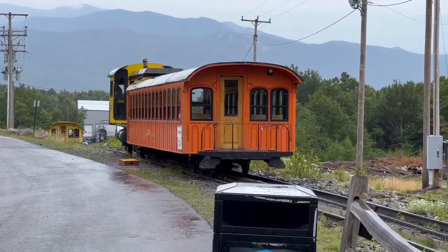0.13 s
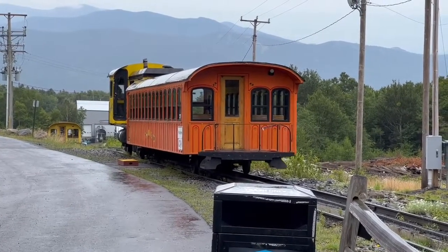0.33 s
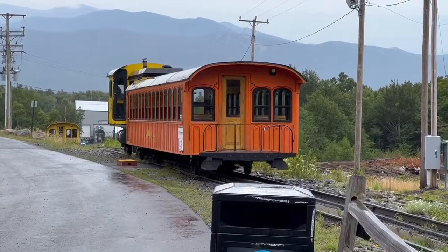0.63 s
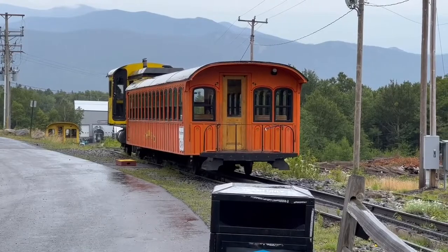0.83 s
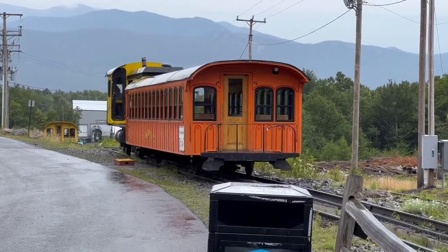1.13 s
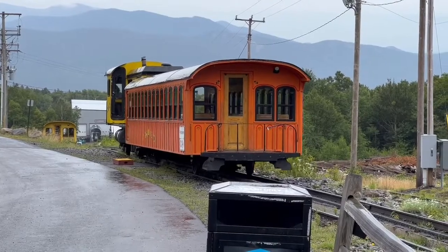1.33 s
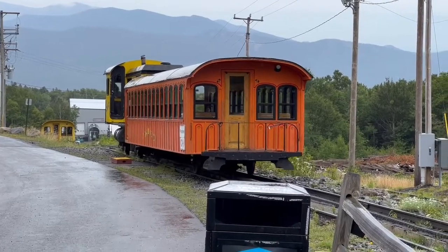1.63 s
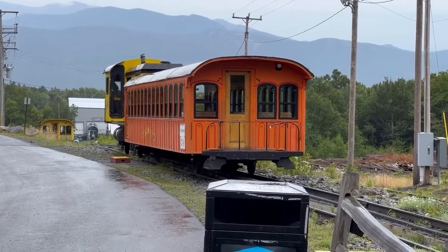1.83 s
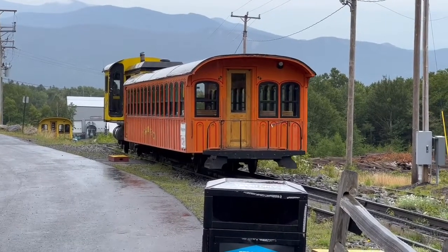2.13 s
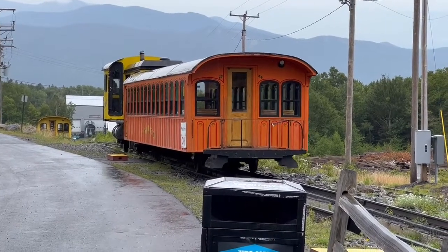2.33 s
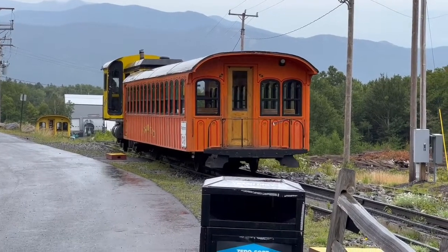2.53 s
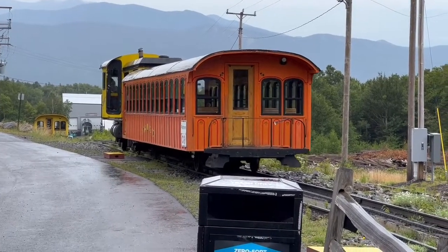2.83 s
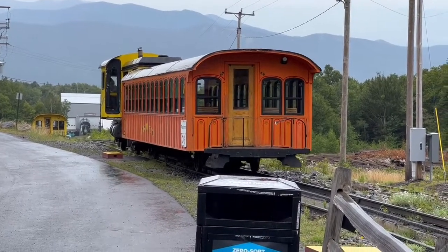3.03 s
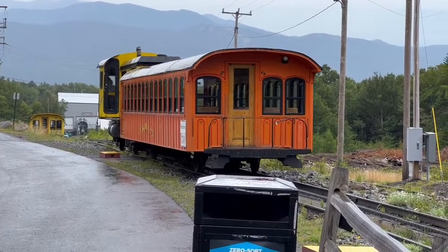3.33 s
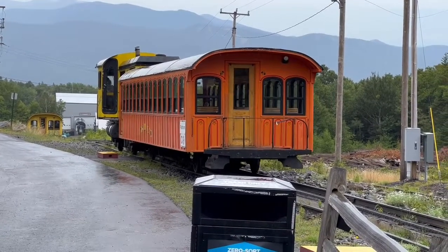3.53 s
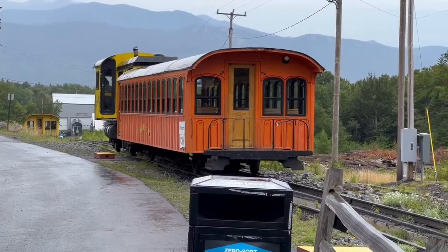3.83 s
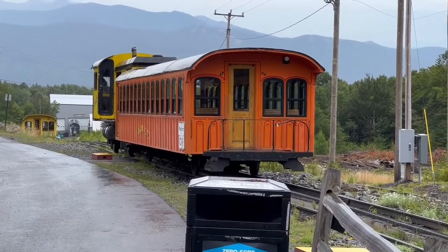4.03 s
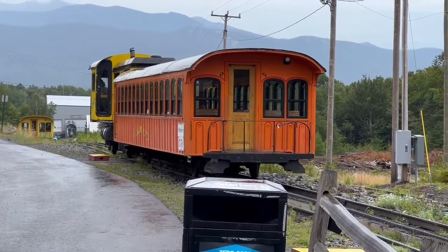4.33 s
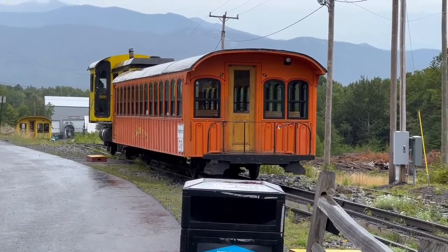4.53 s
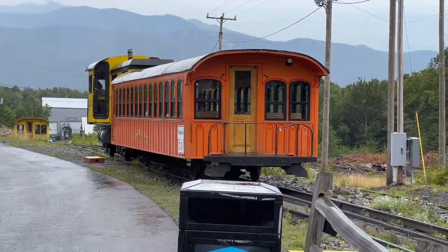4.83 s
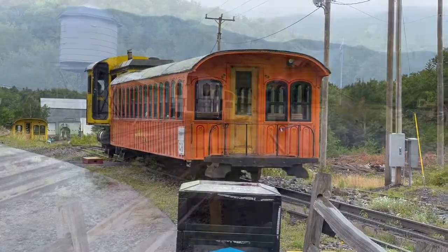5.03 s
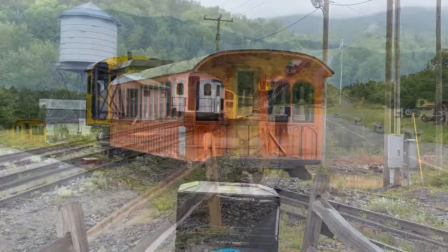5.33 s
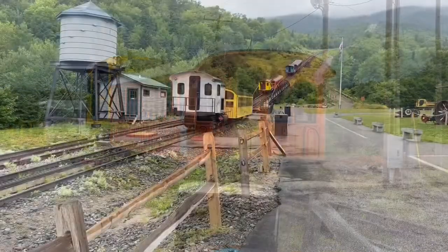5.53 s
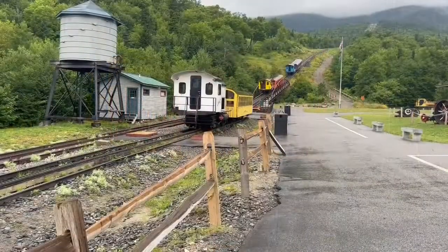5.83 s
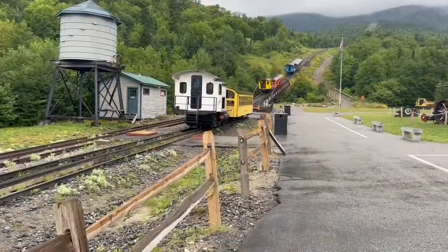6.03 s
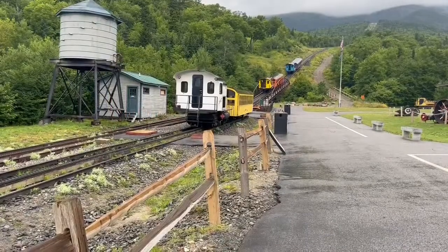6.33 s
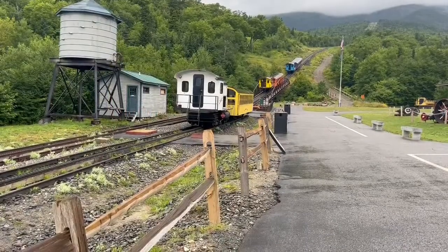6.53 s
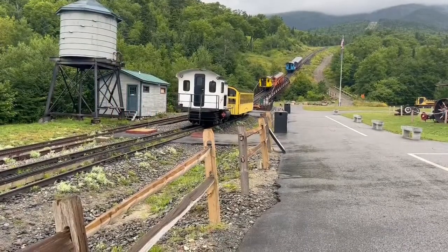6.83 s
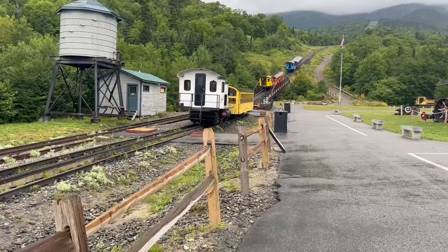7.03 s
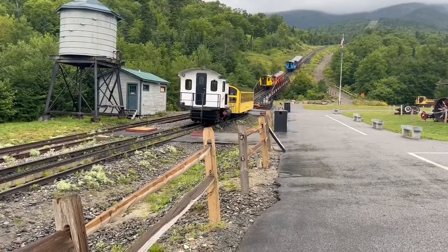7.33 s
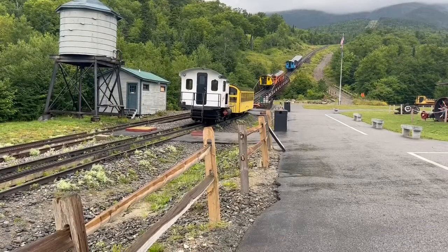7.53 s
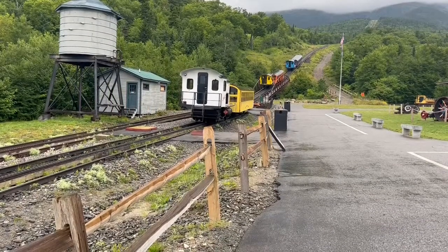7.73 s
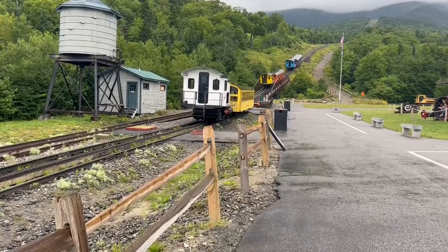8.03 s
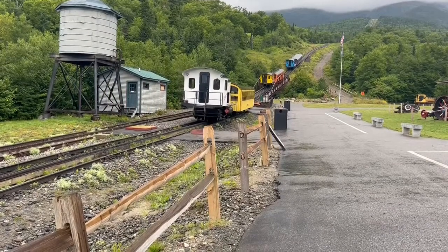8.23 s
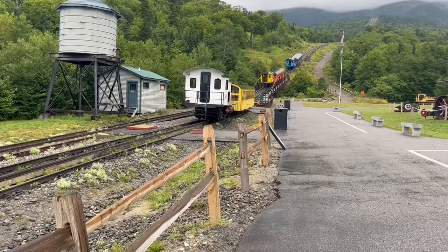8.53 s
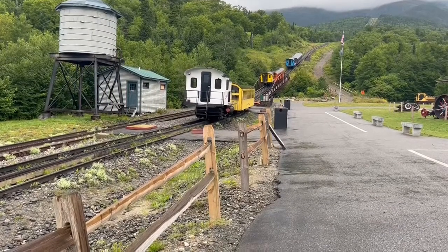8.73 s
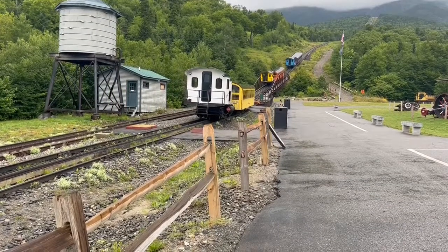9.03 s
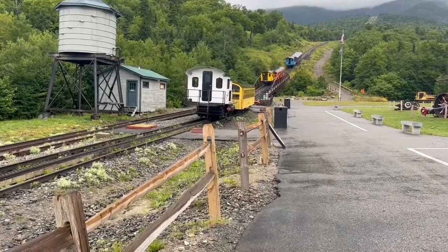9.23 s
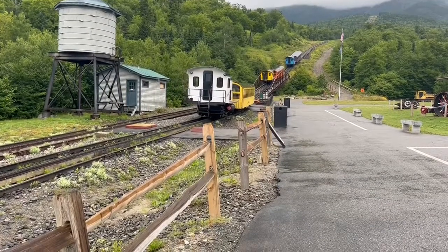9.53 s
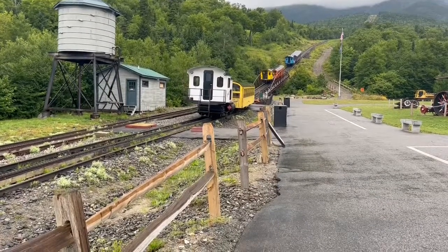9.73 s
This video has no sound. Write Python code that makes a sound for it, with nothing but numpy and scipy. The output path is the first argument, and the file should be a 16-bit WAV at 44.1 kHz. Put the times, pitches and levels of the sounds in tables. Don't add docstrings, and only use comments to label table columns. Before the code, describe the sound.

Wind thumps the microphone over a distant idling diesel locomotive with thin squeals, then a fade to a nearer, louder engine clanking and rattling.

```python
import sys
import numpy as np
from scipy import signal
from scipy.fft import rfft, irfft, next_fast_len
from scipy.io import wavfile
from scipy.ndimage import uniform_filter1d

SR = 44100
rng = np.random.default_rng(int(sys.argv[2]) if len(sys.argv) > 2 else 0)


def volts(x):
    e = np.asarray(x, float) / 20
    return 10 ** e


def digitize_waveform(pressure):
    field = np.atleast_2d(pressure).T
    bounded = np.clip(field, -1, 1)
    quanta = np.round(bounded * 32767).astype(np.int16)
    wavfile.write(sys.argv[1], SR, quanta)


N = 436149
TIME = np.arange(N) / SR
FAR, NEAR = 0, 1
DISSOLVE = (4.79, 5.5)


def evened(x):
    return x / np.sqrt(np.mean(x ** 2) + 1e-20)


def read(points, hz):
    f, db = np.transpose(points)
    return np.interp(np.log(hz + 1), np.log(f + 1), db, -200, -200)


def curves(rows):
    s, *columns = np.transpose(rows)
    return [np.interp(TIME, s, c) for c in columns]


def add(mix, s, sound):
    part = mix[round(s * SR):][:len(sound)]
    part += sound[:len(part)]


def coloured(db):
    return irfft(rfft(rng.standard_normal(N)) * volts(db), N)


def wander(hz):
    n = next_fast_len(N // 64 + 2)
    fall_db = -24 * (np.fft.rfftfreq(n, 64 / SR) / hz) ** 2
    slow = irfft(rfft(rng.standard_normal(n)) * volts(fall_db), n)
    return evened(np.interp(np.arange(N) / 64, np.arange(n), slow))


def resonate(x, hz, width, order=1):
    turn = np.exp(2j * np.pi * np.cumsum(hz * np.ones(len(x))) / SR)
    r = np.exp(-np.pi * width / SR)
    smooth = signal.sosfilt([[1 - r, 0, 0, 1, -r, 0]] * order, x / turn + 1e-18)
    return 2 * (turn * smooth).real


def gap(x, low_hz, high_hz, slope_hz=1):
    hz = np.fft.rfftfreq(N, 1 / SR)
    away = np.maximum(low_hz - hz, 3 * (hz - high_hz))
    edge = volts(-30 * np.clip(1 - away / slope_hz, 0, 1))
    return irfft(rfft(x) * (away > 0) * edge, N)


def swells(rows):
    power = 0
    for s, db, rise, t60 in rows:
        fall_db = np.where(TIME < s, 40 * (s - TIME) / rise, 120 * (TIME - s) / t60)
        power = power + volts(2 * db - fall_db)
    return np.sqrt(power)


def ports(mid, side):
    return np.array([mid + side, mid - side])


def dissolve(far, near):
    turn = np.interp(TIME, DISSOLVE, [0, np.pi / 2])
    return far * np.cos(turn) + near * np.sin(turn)


# time in seconds, load as roar level in dB,
# firing tone in dB, fan tone in dB.
ENGINE = [(0.0, -42.5, -32, -37.5), (0.4, -40.5, -38.5, -41.5), (0.93, -41.5, -31.5, -38.5),
          (1.4, -41, -38.5, -50), (1.9, -41, -37, -41), (2.7, -41, -33.5, -40.5), (3.03, -40, -32, -51),
          (3.66, -40, -34, -40), (4.1, -39.5, -36, -43.5), (5.05, -40.5, -31, -45), (5.45, -36, -30, -34.5),
          (5.87, -32.5, -27.5, -38), (7.0, -34, -28, -34.5), (7.75, -34.5, -31, -35),
          (8.55, -34, -34, -33.5), (9.0, -34, -33.5, -40), (9.55, -35, -34, -32), (9.89, -34, -30.5, -46)]


def follows_load(db, share):
    idle_db = -42
    return db + share * (curves(ENGINE)[0] - idle_db)


def hiss_level():
    return follows_load(-55, 0.75)


# peak time in seconds, peak level in dB, rise in seconds, t60 in seconds.
GUSTS = [
    (0.062, -14, 0.13, .11),
    (0.14, -28.5, .03, 7.6),
    (0.7, -43, .1, 4),
    (1.0, -37, .2, 2),
    (1.33, -27, .25, .3),
    (1.58, -24, 0.16, .1),
]


def wind():
    lumps = resonate(rng.standard_normal(N), 52.0, 55, order=2)
    out = volts(-6.5) * swells(GUSTS) * evened(lumps)
    return ports(out, .08 * out)


# frequency in Hz, level in dB per Hz.
AIR_MID = [(6350, -38), (10800, -24), (11150, -3), (11500, -5), (12200, 0.5), (13400, -6.5), (15300, -10)]
AIR_SIDE = [(5060, -26), (8600, -1.5), (11200, -8), (11900, -1), (12800, -13), (12900, -18), (12900, -34),
            (13900, -43), (14000, -31), (14500, -10), (15400, -16)]


def air():
    far_db, flicker_db, jolt_db, blow_db = 1.5, 2, 41, 36
    hz = np.fft.rfftfreq(N, 1 / SR)
    hiss_db = hiss_level()
    mid, side = evened(coloured(read(AIR_MID, hz))), evened(coloured(read(AIR_SIDE, hz)))
    top = ports(volts(1.23 * hiss_db - 10.5) * mid, volts(0.95 * hiss_db - 21.5) * side)
    blows = [(s, db, .006, .1) for s, db, *_ in TICKS + CLANKS]
    near = volts(flicker_db * wander(12)) + np.sqrt(volts(jolt_db) * swells(JOLTS)) + volts(blow_db) * swells(blows)
    top = top * dissolve(volts(far_db), near)
    singing = np.zeros(N)
    for s, length, *_ in SQUEALS:
        singing[(TIME > s) & (TIME < s + length + .006)] = 1
    singing = uniform_filter1d(singing, 600)
    return top * (1 - singing) + singing * gap(top, 13050, SR)


# start in seconds, length in seconds, level in dB, centre in Hz.
PUFFS = [
    (.5, 0.092, -67, 6500),
    (1.38, 0.049, -61.5, 7400),
    (2.798, 0.1, -59, 7000),
    (3.43, 0.078, -64, 6500),
]


def puffs():
    out = np.zeros(N)
    for s, length, db, hz in PUFFS:
        n = int(1.6 * length * SR)
        jet = resonate(rng.standard_normal(n), hz, 2200, order=2)
        add(out, s, volts(db) * evened(jet) * signal.windows.tukey(n, .6))
    return ports(out, .05 * np.roll(out, 30))


# peak time in seconds, peak level in dB, rise in seconds, t60 in seconds.
LURCHES = [
    (2.75, -38, .2, 1.1),
    (5.75, -31, 0.28, 2),
    (6.3, -32, 0.32, 1.6),
    (7.8, -33, 0.16, 1.1),
    (8.9, -29.5, 0.24, 1.4),
]
ROLL = [
    (8.0, -46.5, 1.9, 6.3),
    (9.6, -42, 1.7, 5),
]


def rolling():
    shake = rng.standard_normal(N)
    out = swells(LURCHES) * evened(resonate(shake, 105.0, 45, order=2))
    out += swells(ROLL) * evened(resonate(shake, 272, 130, order=2))
    return ports(out, .06 * out + .05 * np.roll(out, 90))


# start in seconds, length in seconds, level in dB, pitch in Hz,
# glide over the slip in Hz.
SQUEALS = [(0.188, 0.048, -52, 12630, 250), (0.26, 0.091, -57, 12450, 400), (0.44, 0.11, -58, 12850, -350),
           (0.488, .11, -56, 12550, 251), (0.748, 0.06, -56, 12500, -100), (0.89, 0.13, -55, 12650, -50),
           (1.041, 0.12, -52.5, 12440, 350), (1.15, .1, -56, 12500, 350), (1.25, .06, -63, 12800, 2),
           (1.85, 0.07, -56, 12740, 200), (2.053, .07, -54, 12800, 150), (2.174, .057, -53, 12700, 195),
           (2.334, 0.043, -54, 12900, -200), (2.435, 0.17, -55, 12730, -55),
           (2.568, 0.24, -56.5, 12630, 51), (2.746, 0.1, -55, 12520, 250), (2.838, 0.075, -60, 12700, -300),
           (2.888, 0.09, -58, 12750, -50), (3.04, 0.082, -55, 12900, 153), (4.138, 0.044, -53, 12900, 0),
           (4.18, .14, -57, 12740, -100), (4.342, 0.13, -62, 12660, -50), (4.48, 0.095, -62, 12530, 100),
           (4.57, 0.34, -58, 12700, -120), (4.779, .11, -58, 12500, 204), (4.883, 0.1, -59, 12650, 150),
           (4.995, .065, -58, 12680, 100)]


def squeal():
    rise_s, sag_db, stop_s, stutter_s = 0.008, -7, 0.029, 0.0084
    out, waver = np.zeros(N), wander(40)
    for s, length, db, hz, glide_hz in SQUEALS:
        t = np.arange(0, length, 1 / SR)
        pitch = hz + glide_hz * t / length + 70 * waver[round(s * SR):][:len(t)]
        starts = volts(0.79 * rng.exponential(1, len(t))) * (rng.random(len(t)) < 45 / SR)
        bursts = signal.lfilter([1], [1, -np.exp(-1 / (stutter_s * SR))], starts)
        slips = rng.standard_normal(len(t)) * (.5 + bursts)
        ring = resonate(slips, pitch, 210, order=3)
        edges = np.minimum(t / rise_s, 1) ** 2 * np.minimum((length - t) / stop_s, 1)
        add(out, s, volts(db + sag_db * t / length) * edges * evened(ring))
    out = gap(gap(out, 0, 12150), 13060, SR)
    return ports(out, .35 * np.roll(out, 300))


BLOW_S = np.arange(9000) / SR


def blow_noise():
    return rng.standard_normal(len(BLOW_S))


# start in seconds, peak level in dB.
TICKS = [(5.3063, -41), (5.4196, -57), (5.53, -39.5), (5.6391, -43), (5.7528, -59), (5.8686, -37),
         (6.0881, -38), (6.2013, -42), (6.3194, -52), (6.4258, -47), (6.5415, -39), (6.6398, -48),
         (6.8637, -34.5), (7.2105, -39), (7.3296, -37), (7.9418, -41), (8.0466, -49), (8.1678, -39)]


def ticks():
    out = np.zeros(N)
    for s, db in TICKS:
        click = evened(resonate(blow_noise(), 7600, 1700, order=2))
        add(out, s, volts(db - 9.0 - 60 * BLOW_S / 0.03) * click)
    return out


# start in seconds, peak level in dB, pitch in Hz, t60 in seconds.
CHINKS = [(5.37, -44, 3760, 0.31), (5.4, -48, 3630, 0.17), (5.419, -54, 6870, .1), (5.613, -54, 6970, .1),
          (5.67, -55, 6820, .1), (5.718, -52, 6980, .12), (5.753, -56, 6900, .1), (6.069, -56, 6980, .08),
          (8.045, -45, 3750, 0.17), (8.112, -54, 7010, .1), (8.236, -49, 4200, .1), (8.25, -53, 6540, .2),
          (8.285, -51, 6990, .12), (8.399, -53, 7100, .1), (8.581, -51, 6860, .15), (8.958, -55, 6900, .1),
          (9.125, -48, 4020, .1), (9.326, -52, 6910, .1), (9.53, -51, 7680, .1), (9.58, -48, 4080, .12),
          (9.638, -49, 4100, .1), (9.7265, -53, 6980, .1), (9.865, -50, 6950, .1)]


def chinks():
    out = np.zeros(N)
    for s, db, hz, t60 in CHINKS:
        link = evened(resonate(blow_noise(), hz, 160, order=2))
        add(out, s, volts(db - 60 * BLOW_S / t60) * link * np.minimum(BLOW_S / .003, 1))
    return out


# resonance in Hz, width in Hz, level in dB.
LOOSE = [(3620, 25, 0.5), (3720, 88, -2.5), (4655, 68, 2), (5070, 75, -1), (5875, 70, -15), (6150, 50, -7),
         (6620, 40, -11), (6720, 40, -3), (7040, 60, -3), (7500, 160, -5)]
LOOSE_DETUNE = 0.026
# start in seconds, peak level in dB, low ring in Hz, high ring in Hz,
# high ring in dB.
CLANKS = [(5.379, -44, 4300, 7170, -6), (5.5278, -35, 3540, 6940, -13), (5.9165, -37, 4400, 6900, -7),
          (5.95, -42, 3800, 6990, -4), (8.05, -37, 3800, 5970, -19), (8.2776, -34, 3570, 6900, -13),
          (8.459, -34, 4430, 6620, -7), (8.53, -44, 4000, 6900, -26), (8.5724, -38, 4250, 6170, -28),
          (8.62, -33, 3800, 6950, -18), (8.699, -36, 4650, 6120, -17), (8.849, -29.5, 3780, 6800, -25),
          (9.065, -41, 4400, 7200, -6), (9.1727, -38, 3900, 7460, -8), (9.2496, -32, 4570, 7060, -30),
          (9.2986, -35, 4000, 6080, -18), (9.5086, -42, 4100, 6040, -6), (9.6715, -35.5, 4320, 7060, -11),
          (9.7868, -34, 4620, 6980, -12), (9.841, -36, 4730, 6360, -17)]


def clanks():
    clank_t60_s, crack_t60_s = 0.22, 0.059
    out = np.zeros(N)
    for s, db, low_hz, high_hz, high_db in CLANKS:
        shake = blow_noise()
        ring = evened(resonate(shake, low_hz, 400, order=2) + 0.69 * resonate(shake, 1.1 * low_hz, 550, order=2))
        woken = 0
        for part_hz, width, part_db in LOOSE:
            wake, tune = rng.standard_normal(2)
            part = resonate(shake, part_hz * (1 + LOOSE_DETUNE * tune), 2.4 * width, order=2)
            woken = woken + volts(part_db + 2.5 * wake) * evened(part)
        ring += 0.49 * evened(woken)
        ring += volts(high_db + 6.5) * evened(resonate(shake, high_hz, 700, order=2))
        crack = evened(resonate(shake, 5400, 4300, order=3))
        crack *= volts(-5.5) + volts(-3.0 - 60 * BLOW_S / crack_t60_s)
        fall = volts(db - 13.5 - 60 * BLOW_S / clank_t60_s)
        add(out, s, fall * (ring + crack) * np.minimum(BLOW_S / 0.0028, 1))
    return out


# peak time in seconds, peak level in dB, rise in seconds,
# t60 in seconds.
JOLTS = [(5.41, -58, 0.083, 0.36), (5.58, -56.5, .05, 3.3), (5.92, -71, 0.22, 3), (8.3, -55, 0.33, 2),
         (8.6, -50, 0.39, 0.82), (8.84, -53, .015, 0.61), (9.08, -52, .02, .12), (9.25, -44.5, 0.0099, .32),
         (9.56, -58, .15, .4), (9.68, -53, .06, 1.1), (9.78, -46.5, .008, .8)]


def rattle():
    bed_db, hits_per_s = -62, 1200
    sizes = volts(2.4 * np.minimum(rng.exponential(1, N), 4))
    hits = sizes * (rng.random(N) < hits_per_s / SR) * rng.choice([-1, 1], N)
    sway = .6 * wander(12)
    struck = rng.integers(0, len(LOOSE), N)
    parts = 0
    for i, (hz, width, db) in enumerate(LOOSE):
        pitch = hz * (1 + LOOSE_DETUNE * np.roll(sway, i * SR))
        parts = parts + volts(db) * evened(resonate(hits * (struck == i), pitch, width + 60, order=2))
    clatter = evened(parts) + 0.74 * evened(resonate(hits, 5300, 3500, order=2))
    return (swells(JOLTS) + dissolve(0, volts(bed_db))) * evened(clatter)


# peak time in seconds, peak level in dB, rise in seconds, t60 in seconds.
WHINE = [
    (6.42, -58, .15, 3),
    (6.58, -63, .4, 1.2),
    (8.3, -65, .3, 2),
    (9.55, -61, .1, 1.5),
    (7.91, -61, .04, 9),
    (9.89, -63, 0.97, 1),
]


def gear_whine():
    return volts(-2.0) * swells(WHINE) * evened(resonate(rng.standard_normal(N), 6040, 420, order=2))


def metal():
    blows = ticks() + chinks() + clanks() + rattle()
    whine = gear_whine()
    return ports(blows + whine, .25 * blows + .5 * np.roll(blows, 40) + 0.5 * np.roll(whine, 3))


# frequency in Hz, width in Hz, level in dB rms.
BOOMS = [
    [(293.7, 15, -49.5), (95, 28, -44.5), (4200, 160, -65.5)],
    [(744, 47, -50.5), (117.8, 10.8, -40.5), (265.5, 57, -50), (4190, 310, -58.5), (659, 19, -50),
     (1732, 47, -57.5), (1898, 36, -54), (2108, 17, -58), (2415, 110, -57)],
]


def body_booms(k):
    hz = np.fft.rfftfreq(N, 1 / SR)
    response = 0
    for f, width, db in BOOMS[k]:
        unit_gain = np.sqrt(2 * SR / (np.pi * width))
        response = response + volts(db) * unit_gain / (1 + 2j * (hz - f) / width) ** 2
    return irfft(rfft(rng.standard_normal(N)) * response, N)


FAN_DB = [
    (0, -6.5, -14, -11.5),
    (0, -17, -32, -23.5),
]


def fan(k, fan_db, drift):
    blade_hz, follow = (144.8, 144.1)[k], 0.36
    blades = np.cumsum(blade_hz * (1 + 0.00161 * wander(2.36))) / SR
    half = N // 2
    usual_db = fan_db[half * k:][:half].mean()
    out = 0
    for n, db in enumerate(FAN_DB[k]):
        level_db = fan_db if n == 0 else follow * fan_db + (1 - follow) * usual_db
        out = out + volts(db + 0.43 * n * drift[n] + level_db) * np.cos(2 * np.pi * (n + 1) * blades)
    return out


# multiple of the cycle, level in dB rms.
ORDERS_FAR = [(6, -36), (12, -43), (13, -45), (18, -51), (32, -56), (48, -59), (56, -60), (66, -60),
              (68, -60), (72, -56), (75, -61), (78, -59), (80, -62), (81, -62), (82, -62), (84, -58),
              (87, -63), (88, -63), (93, -64), (94, -63), (98, -65), (99, -66), (106, -66), (119, -67),
              (123, -68), (136, -60), (150, -69)]
ORDERS_NEAR = [(5, -46), (6, -31), (12, -39), (18, -48), (21, -50), (39, -59), (51, -65), (54, -61),
               (56, -59), (60, -56), (66, -58), (68, -52), (72, -59), (73, -55), (75, -57), (77, -58),
               (78, -59), (81, -55), (86, -59), (90, -58), (93, -59), (111, -57), (114, -62), (118, -57),
               (136, -55), (150, -57), (214, -63)]
# peak time in seconds, peak level in dB, rise in seconds,
# t60 in seconds.
MESH_SWELLS = [
    (5.3, -45, .25, 1.5),
    (6.11, -49, .04, 1.5),
    (6.7, -50, .4, 0.54),
    (7.3, -44, 0.48, 1.9),
    (8.1, -47, .2, 1.5),
]


def engine(k, orders):
    cycle_hz, mesh_order, mesh_db = (9.127, 9.076)[k], 136, (-73.5, -53.5)[k]
    roar_ref_db = (-36.5, -35.5)[k]
    turns = np.cumsum(cycle_hz * (1 + 0.001226 * wander(1.54))) / SR
    roar_db, firing_db, fan_db = curves(ENGINE)
    octave_db = firing_db - 9.5 + 1.5 * wander(0.61)
    firing = volts(firing_db - .4) * np.cos(12 * np.pi * turns)
    firing += volts(octave_db) * np.cos(24 * np.pi * turns + .7)
    drift = [wander(8.7) for _ in range(5)]
    rest = np.zeros(N)
    for i, (n, db) in enumerate(orders):
        if round(n) in (6, 12, 214):
            continue
        flutter = 1 + 0.0041 * n * drift[i % 5]
        phase = round(n) * (turns + 0.0013 * drift[i % 4]) + rng.random()
        rest += volts(db) * flutter * np.cos(2 * np.pi * phase)
    mesh = volts(mesh_db + 2.0 * drift[4])
    if k == NEAR:
        mesh = mesh + volts(-1) * swells(MESH_SWELLS)
    rest += mesh * np.cos(2 * np.pi * mesh_order * turns)
    load_db = 0.46 * (roar_db - roar_ref_db)
    tones = firing + volts(load_db) * rest + volts(-1.0) * fan(k, fan_db, drift)
    return np.sqrt(2) * tones + body_booms(k), turns


def wide_noise(spectrum, width, tied, lead, lead_per_khz):
    hz = np.fft.rfftfreq(N, 1 / SR)
    f, side_db = np.transpose(width)
    a, b = rfft(rng.standard_normal((2, N))) * volts(read(spectrum, hz))
    tied = np.clip(tied, 0, 1)
    turned = np.exp(1j * (lead + lead_per_khz * hz / 1000)) * a
    b = tied * turned + np.sqrt(1 - tied ** 2) * b
    b *= volts(np.interp(np.log(hz + 1), np.log(f), side_db))
    mid, side = irfft(np.array([a, b]), N)
    return ports(mid, side) / np.std(mid)


# frequency in Hz, level in dB per Hz.
RUMBLE = [
    [(14, -33), (24, -25), (43, -1.5), (70, 2.5), (126, -1.5), (241, -8), (297, -14.5), (365, -15.5), (450, -18), (580, -35), (990, -120)],
    [(14, -32), (24, -17), (54, -3.5), (97, -1.5), (142, -1.5), (188, -4), (356, -15), (450, -30), (580, -50), (990, -120)],
]
ROAR = [
    [(220, -25), (380, -4.5), (404, -12), (436, -5.5), (555, -7), (610, -3), (667, -4), (806, -6.5), (871, -5.5), (950, -10), (1200, -9.5), (1740, -13), (2020, -10.5), (2290, -17), (3000, -22), (3900, -29), (6600, -120)],
    [(220, -29), (380, -4), (450, -10.5), (500, -5), (600, -1), (690, -6), (738, -1), (800, -2), (1000, -5), (1230, -2), (1500, -7), (1900, -5.5), (2250, -11), (2580, -15), (2720, -22.5), (3900, -37)],
]
HISS = [
    [(1590, -18), (2700, -1.5), (3120, -2), (3780, -5.5), (4080, 0), (4280, -0.5), (4850, -10), (5430, -11.5), (6850, -12.5), (7640, -13.5), (8650, -18), (9300, -5.5), (12100, -53), (12900, -120)],
    [(1590, -19), (2700, -0.5), (3410, -4.5), (4170, -1), (4820, -7.5), (5210, -6.5), (5660, -13), (6080, -11), (7370, -14), (8650, -16), (8970, -27), (9300, -10), (12100, -61), (20500, -120)],
]
# frequency in Hz, side minus mid in dB.
WIDTH = [
    [(60, -29), (200, -16), (400, -11), (700, -6), (1300, -5), (1900, -16.5), (2600, -27), (3000, -9.5), (4300, -9.5), (5100, -13), (5400, -28), (5900, -4.5), (6400, -30), (7500, -28), (7700, -19)],
    [(60, -18), (200, -20), (400, -6.5), (700, -4.5), (1300, -4), (2400, -3.5), (4300, -1), (5500, -2.5), (5900, 2), (6400, 1), (8000, -15), (9000, 0)],
]
# share of the side that copies the mid,
# its phase lead in radians, lead in radians per kHz.
TIED = [
    [(0.31, .1, 0), (0.068, .3, .3), (0.1, .5, 0.08)],
    [(0.37, 0.27, 0), (0.45, 1.07, 0.3), (.6, 1.17, 0)],
]


def locomotive(k, orders, lean):
    tones, turns = engine(k, orders)
    roar_db, hiss_db = curves(ENGINE)[0], hiss_level()
    rumble_db = follows_load(-36.47, 0.72) + 0.77 * wander(0.49)
    if k == NEAR:
        rumble_db += 0.6 + 0.3 * (TIME - 7.5)
    pulse = 1 + 0.018 * np.cos(4 * np.pi * turns)
    pulse += 0.033 * np.cos(12 * np.pi * turns) + 0.036 * np.cos(20 * np.pi * turns)
    pulse *= volts(0.5 * wander(23))
    rumble_tie, roar_tie, hiss_tie = TIED[k]
    out = ports(tones, lean * tones)
    out += volts(rumble_db) * wide_noise(RUMBLE[k], WIDTH[k], *rumble_tie)
    out += volts(roar_db - 0.5) * pulse * wide_noise(ROAR[k], WIDTH[k], *roar_tie)
    return out + volts(hiss_db + 0.02) * pulse * wide_noise(HISS[k], WIDTH[k], *hiss_tie)


def scene():
    mid_gap, side_gap, top_hz = (9450, 10850), (12600, 14500), 15400
    trains = dissolve(locomotive(FAR, ORDERS_FAR, 0.079), locomotive(NEAR, ORDERS_NEAR, 0.072))
    left, right = trains + air() + puffs() + wind() + rolling()
    steel = metal()
    mid = gap((left + right) / 2, *mid_gap, 740) + gap(steel.mean(0), *mid_gap, 330)
    side = (left - right + steel[0] - steel[1]) / 2
    return ports(gap(mid, top_hz, SR, 300), gap(side, *side_gap, 300)) + squeal()


def low_pass(x):
    return signal.sosfilt(signal.butter(12, 15540, fs=SR, output="sos"), x)


def record(dry):
    low_cut = signal.butter(N=4, Wn=38, btype="high", fs=SR, output="sos")
    mix = signal.sosfilt(low_cut, dry)
    return low_pass(mix)


dry = scene()
out = record(dry)
digitize_waveform(out)
```